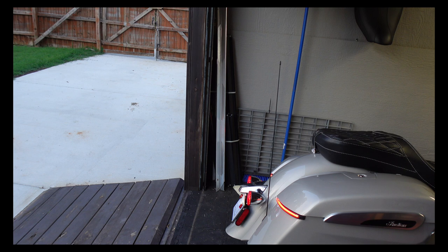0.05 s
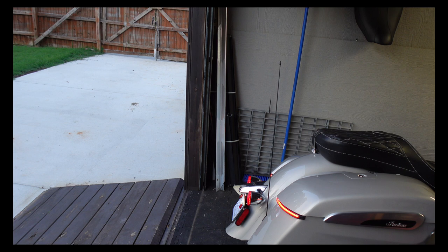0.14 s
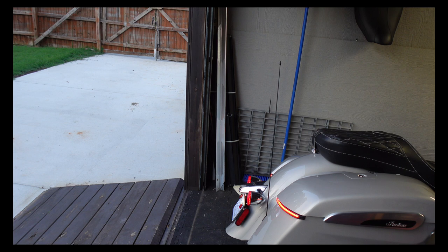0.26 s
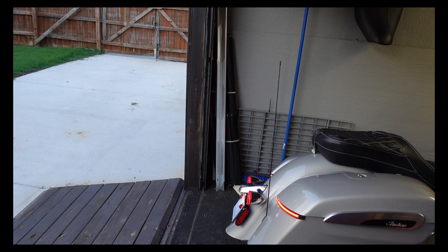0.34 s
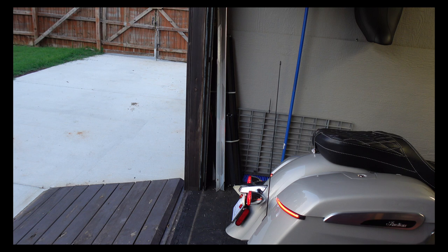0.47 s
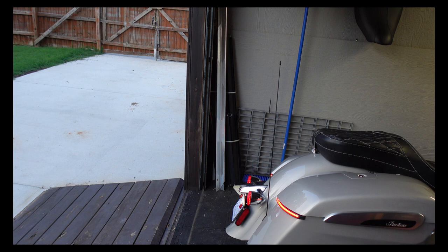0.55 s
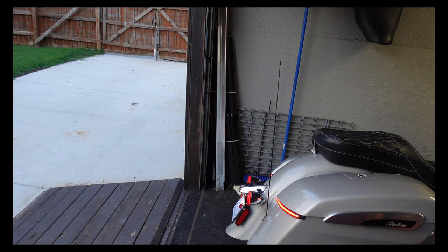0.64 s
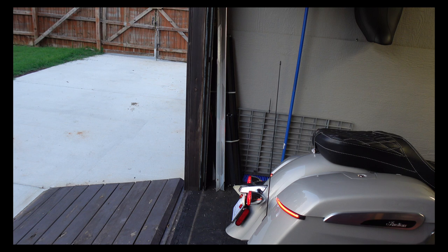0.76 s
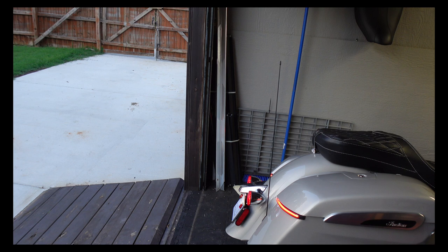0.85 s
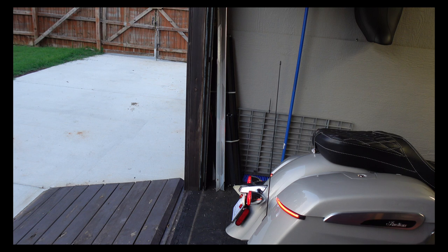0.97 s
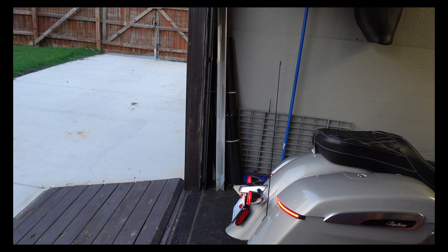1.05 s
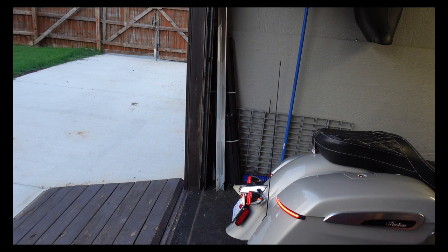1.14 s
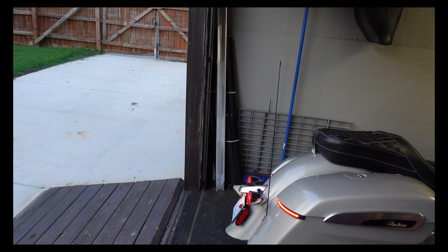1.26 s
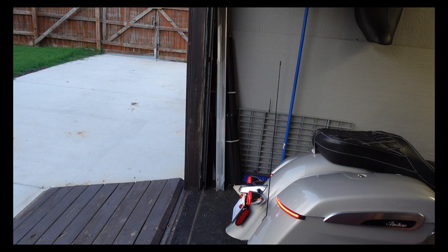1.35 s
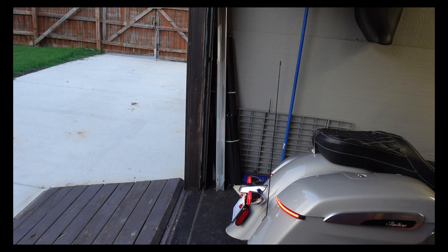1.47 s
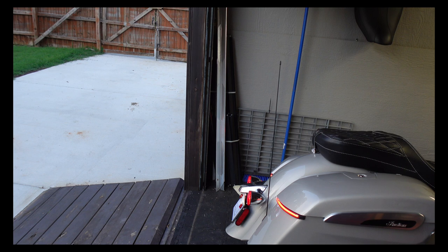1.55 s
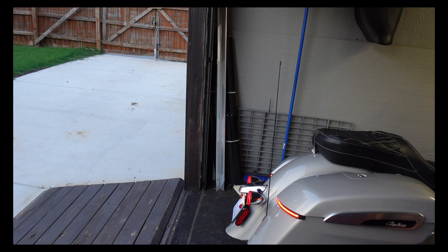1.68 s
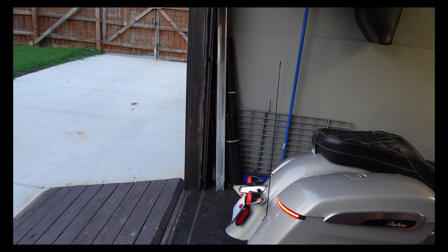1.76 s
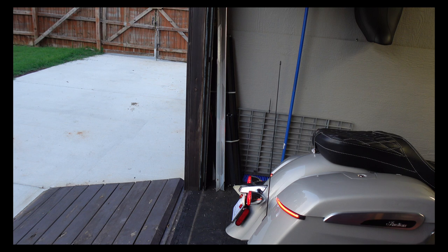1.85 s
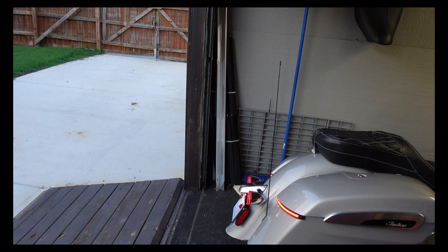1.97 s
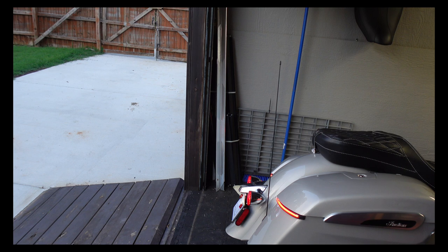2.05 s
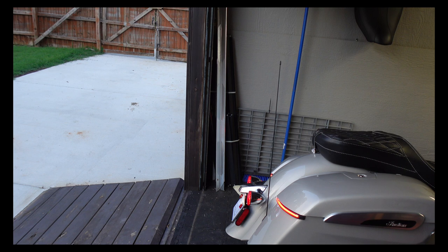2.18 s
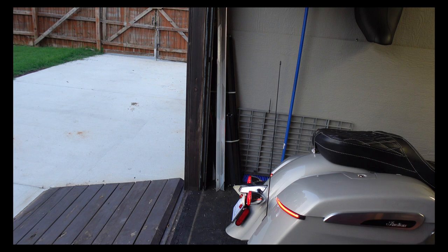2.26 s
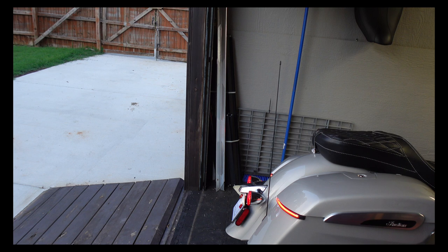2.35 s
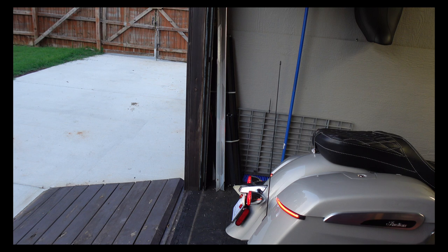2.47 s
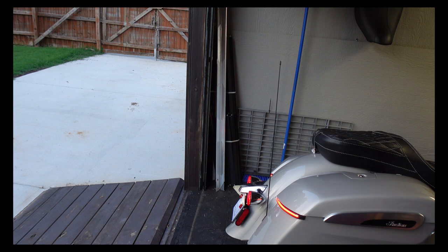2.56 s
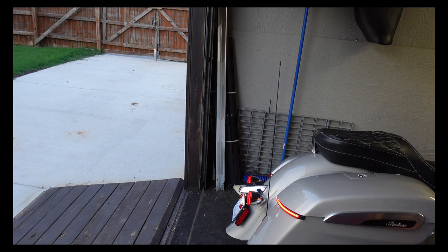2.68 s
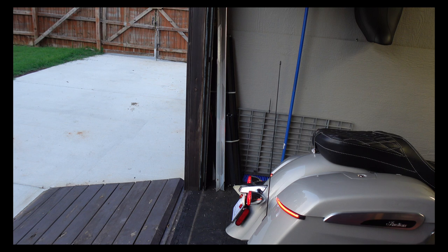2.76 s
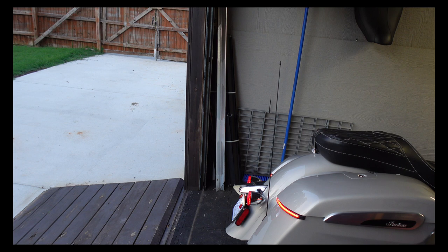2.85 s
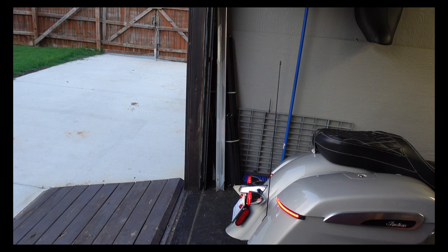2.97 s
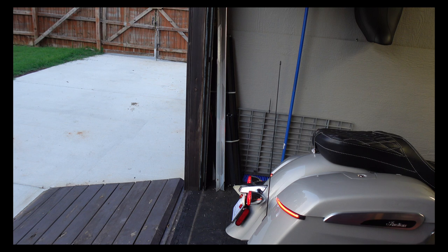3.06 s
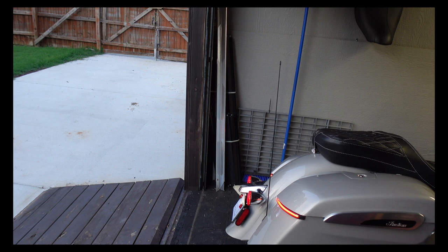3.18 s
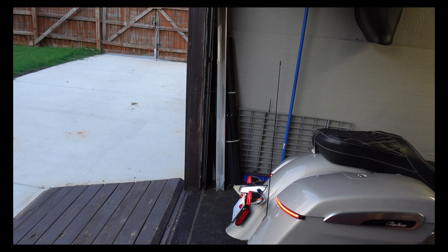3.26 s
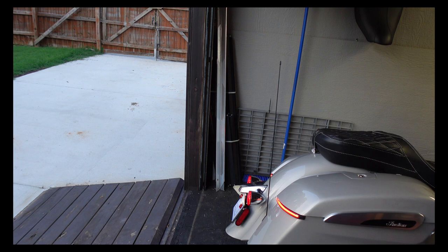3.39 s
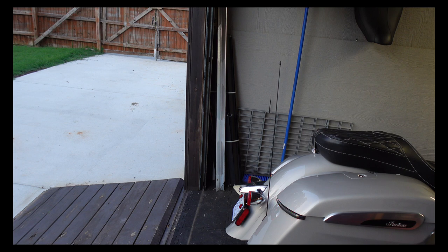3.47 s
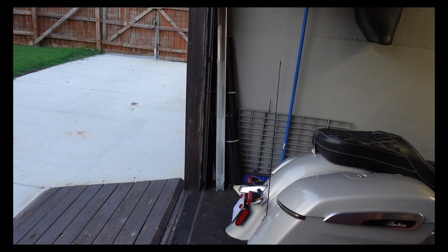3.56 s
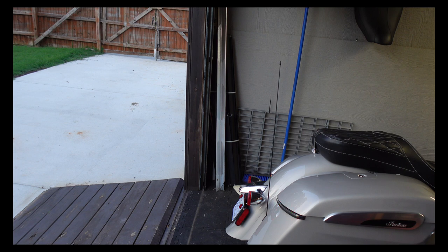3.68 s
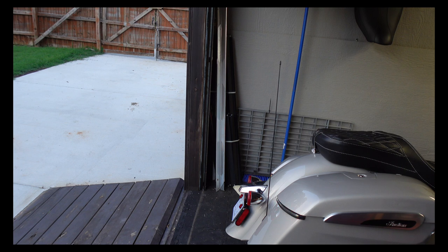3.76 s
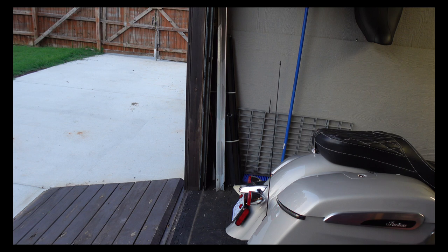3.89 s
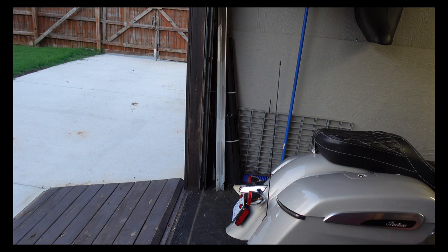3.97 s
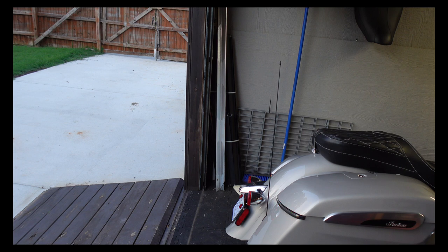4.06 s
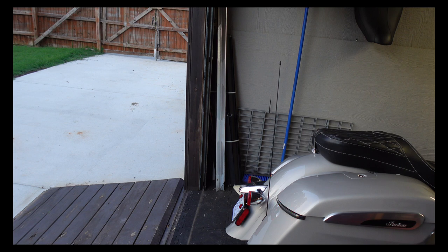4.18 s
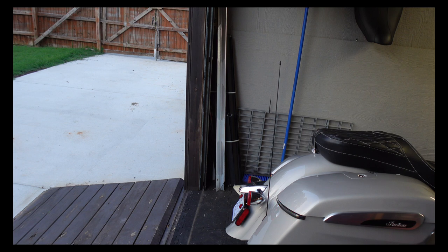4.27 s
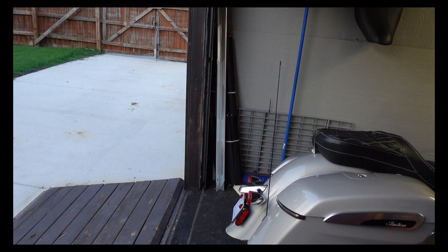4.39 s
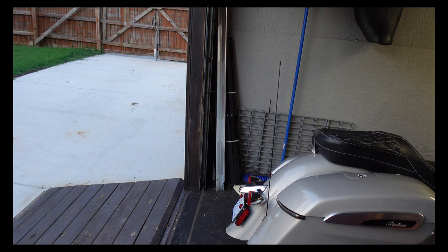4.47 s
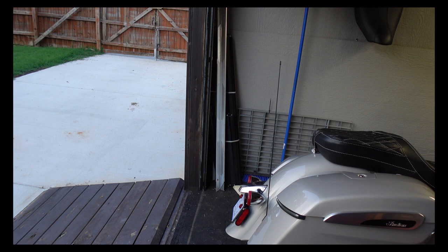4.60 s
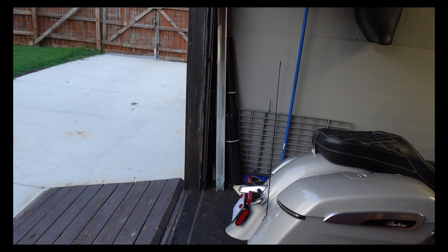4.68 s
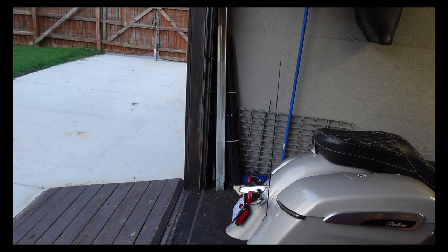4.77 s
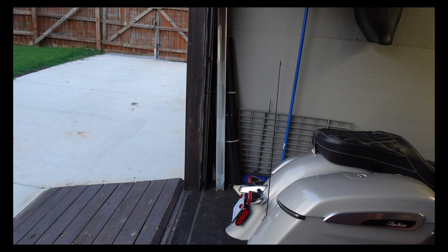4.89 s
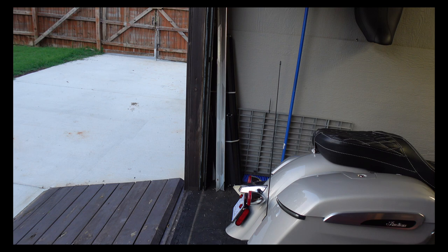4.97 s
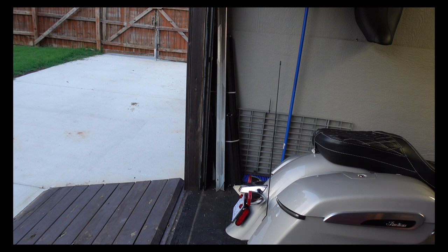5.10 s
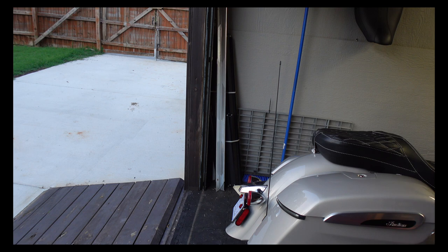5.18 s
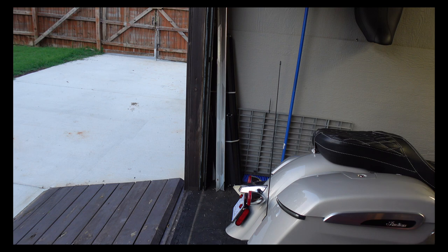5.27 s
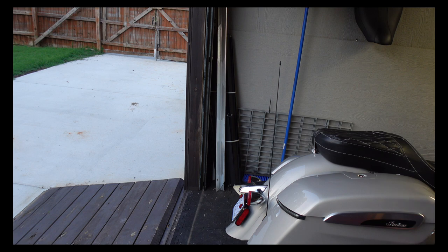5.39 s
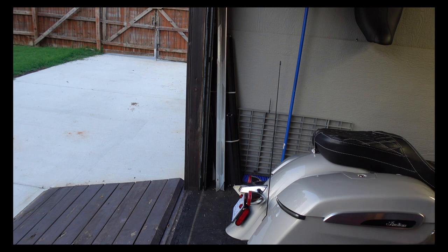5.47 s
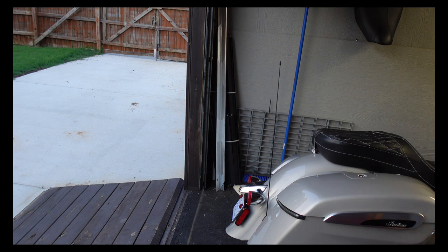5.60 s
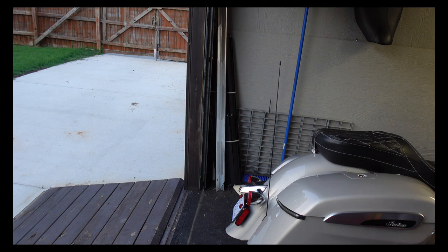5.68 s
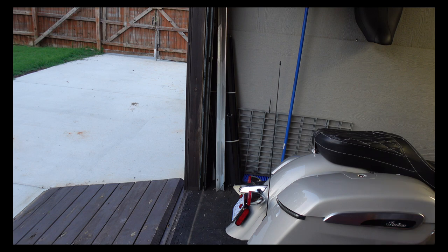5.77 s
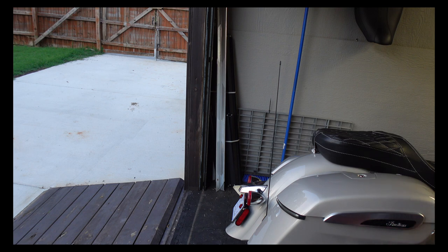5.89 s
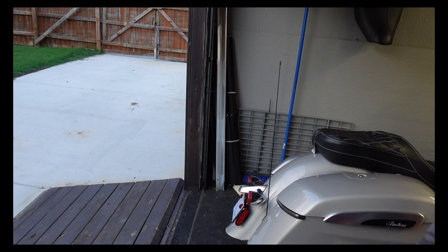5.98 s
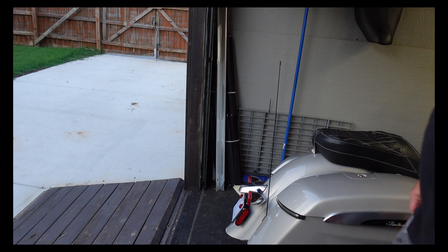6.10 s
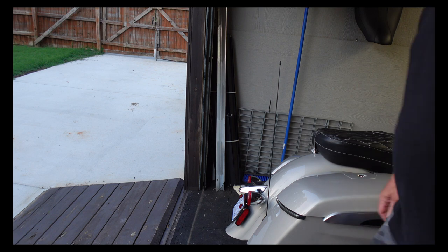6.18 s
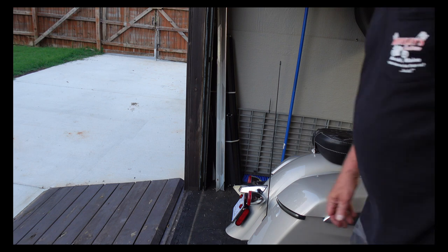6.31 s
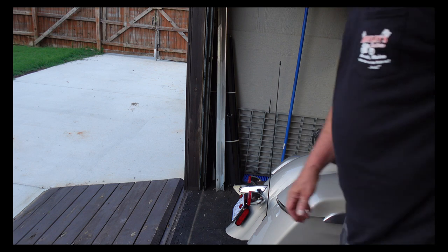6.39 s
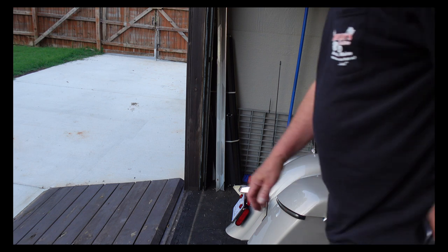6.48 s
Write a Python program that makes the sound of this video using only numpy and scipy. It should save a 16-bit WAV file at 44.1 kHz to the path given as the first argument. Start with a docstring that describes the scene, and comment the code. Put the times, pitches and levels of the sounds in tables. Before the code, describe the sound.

Loud, lumpy motorcycle idle close to the tailpipe, then shut-off: weakening chugs, a metallic clunk, a short airy sigh, and quiet insect hum.

```python
"""Motorcycle idling, then switched off

A big V-twin idles just inside an open garage, its tailpipe close to the microphone, and is switched off.
Each uneven firing cracks, rings the pipe and comes back as a thump; its pressure swing chokes the microphone.
The engine coasts through a few puffs, then knocks and rocks back with a sigh of air.
Shaped noise makes the cracks, sighs and clatter, struck resonators the pipe and boom, short pulses the thumps.
Insects and a far hum outdoors run underneath throughout and are left alone at the end."""
import sys
import numpy as np
from scipy import signal
from scipy.fft import rfft, irfft
from scipy.io import wavfile

SR = 44100
rng = np.random.default_rng(int(sys.argv[2]) if len(sys.argv) > 2 else 0)


def unload_wav(signal):
    """Save mono or channel-first audio to the path in sys.argv[1] as 16-bit WAV at rate SR, clipped to [-1, 1]."""
    wavfile.write(
        sys.argv[1],
        SR,
        np.round(np.clip(np.atleast_2d(signal).T, -1, 1) * 32767).astype(np.int16),
    )


N = 288410
TIME = np.arange(N) / SR
AGE = np.arange(SR // 3) / SR  # seconds since a stroke or knock began


def undb(db):
    """Turn decibels into an amplitude factor."""
    return 10 ** (np.asarray(db) / 20)


def unit(x):
    """Scale to an rms of 1."""
    return x / np.sqrt(np.mean(x ** 2))


def add(track, start_s, sound):
    """Mix a sound into a track, trimmed to the track's ends."""
    start = int(round(start_s * SR))
    first, last = max(start, 0), min(start + len(sound), N)
    track[first:last] += sound[first - start:last - start]


def noise(colour):
    """Noise of rms 1, its spectrum drawn through (Hz, relative dB) points on a log frequency scale."""
    hz, db = np.transpose(colour)
    log_hz = np.log(np.fft.rfftfreq(N, 1 / SR) + 1)  # the 1 avoids log of zero
    gain = undb(np.interp(log_hz, np.log(hz), db))
    return unit(irfft(rfft(rng.standard_normal(N)) * gain, N))


def band(hz, width, size):
    """Noise of rms 1 through a resonance applied twice; the width in Hz is that of one pass."""
    b, a = signal.iirpeak(hz, hz / width, fs=SR)
    once = signal.lfilter(b, a, rng.standard_normal(size))
    return unit(signal.lfilter(b, a, once))


def swell(rise, fade, hold=0):
    """Smooth rise, hold, then exponential fade, all in seconds."""
    onset = np.sin(np.pi / 2 * np.minimum(AGE / rise, 1)) ** 2
    return onset * np.exp(-np.maximum(AGE - rise - hold, 0) / fade)


def ring(modes, detune, scatter_db):
    """Struck decaying resonances; pitch and strength differ from stroke to stroke, as with gas heat."""
    kick, out = signal.unit_impulse(len(AGE)), 0
    for hz, db, t60 in modes:
        turn = 2 * np.pi * hz * (1 + detune * rng.standard_normal()) / SR  # radians per sample
        keep = np.exp(-np.log(1000) / (t60 * SR))  # amplitude kept per sample
        mode = signal.lfilter([0, np.sin(turn)], [1, -2 * keep * np.cos(turn), keep ** 2], kick)
        out = out - undb(db + scatter_db * rng.standard_normal()) * mode
    return out


def thump(hz, delay, length):
    """A low pressure pulse: a cosine in a bell-shaped window, its timing slightly uneven."""
    t = AGE - delay - 0.00016 * rng.standard_normal()
    return np.exp(-(t / length) ** 2) * np.cos(2 * np.pi * hz * t)


# Far traffic's spectrum. Each row: frequency in Hz, relative density in dB.
YARD = [(20, -7), (50, -2), (100, 3), (200, 2.5), (300, -2.5), (500, -6), (1000, -2.5), (1400, -7),
        (1900, -16.5), (2600, -13), (3500, -40.5)]
# The insect chorus's spectrum. Each row: frequency in Hz, relative density in dB.
INSECTS = [(2000, -15), (2600, -18), (3100, -2), (5200, -1.5), (6100, -8), (6700, -2), (7400, -15.5),
           (8500, -26.5), (12000, -29), (16000, -32)]
# Loudness outdoors. Each row: time in seconds, insect level in dB, level of traffic and hum in dB.
OUTSIDE = [(4.5, -50, -55), (5.5, -48.5, -54), (5.7, -47.5, -52.5)]


def outdoors():
    """An insect chorus with a light flutter over far traffic; narrow noise makes a wavering hum."""
    s, insect_db, traffic_db = np.transpose(OUTSIDE)
    flutter = 1 + 0.056 * band(16, 17, size=N)
    chorus = undb(np.interp(TIME, s, insect_db)) * noise(INSECTS) * flutter
    hum = 0.67 * band(102.3, 18, size=N) + 0.26 * band(156.3, 12, size=N)
    traffic = 0.89 * noise(YARD) + hum
    return chorus + undb(np.interp(TIME, s, traffic_db)) * traffic


# Sighs of trapped air. Each row: start in seconds, level in dB, rise, hold and fade in seconds.
SIGHS = [(4.048, -22, .1, .02, .031), (4.215, -37, .022, .006, .09)]
# The sigh's breath spectrum. Each row: frequency in Hz, relative density in dB.
SIGH_COLOUR = [(120, -34), (200, -8), (509, -3), (558, 3), (968, 0), (1370, -11), (1500, 0.5), (1650, -7),
               (4600, -9.5), (10500, -24), (13500, -36), (16000, -59)]
# The sigh's resonances. Each row: frequency in Hz, half the filter width in Hz, relative level in dB.
SIGH_MODES = [(986, 41, -4), (1480, 41, -2.5), (1850, 30, -4), (2342, 27, -3.5), (3070, 72, -7)]


def sighs():
    """Trapped air sighs out as fluttering breath noise coloured by narrow resonances."""
    air = np.zeros(N)
    for s, db, rise, hold, fade in SIGHS:
        add(air, s, undb(db) * swell(rise, fade, hold))
    tones = sum(undb(db) * band(hz, 2 * half_width, size=N) for hz, half_width, db in SIGH_MODES)
    flutter = undb(1.5 * band(85, 200, size=N))
    return air * flutter * (.85 * noise(SIGH_COLOUR) + .5 * unit(tones))


# Knocks and ticks as the crank stops and rocks back, then small handling sounds.
# Each row: start in seconds, level in dB, pitch in Hz, fade in seconds.
KNOCKS = [(3.77, -25, 790, 0.023), (3.895, -19, 130, 0.018), (3.972, -37, 3900, .015),
          (4.003, -19, 210, 0.02), (4.012, -25, 560, 0.035), (4.03, -32, 55, 0.055),
          (4.165, -31, 150, 0.012), (4.228, -34, 700, 0.064), (4.48, -50, 1100, .03),
          (6.082, -60, 8500, .004), (6.17, -48.5, 396, .02)]
# The frame's clunk. Each row: frequency in Hz, level in dB, 60 dB decay in seconds before the swell's fade.
CLUNK = [(331, -21, 0.41), (540, -14.5, .3), (575, -19.5, .25), (745, -27, 0.23)]
STALL_S = 4.005


def knocks():
    """The crank knocks against compression in short noise bands; the frame rings as the crank stalls."""
    out = np.zeros(N)
    for s, db, hz, fade in KNOCKS:
        add(out, s, undb(db) * swell(0.005, fade) * band(hz, 0.83 * hz, size=len(AGE)))
    add(out, STALL_S, ring(CLUNK, detune=.004, scatter_db=3) * swell(0.013, 0.074))
    return out


# Hunting idle speed. Each row: time in seconds, crank speed in rpm.
RPM = [(0.0, 1048), (0.25, 1049), (0.34, 979), (0.66, 934), (1.0, 992), (1.34, 1040), (1.75, 891),
       (1.92, 954), (2.1, 902), (2.18, 1032), (2.27, 935), (2.64, 989), (2.72, 901), (3.05, 947),
       (3.14, 892), (3.22, 992), (3.51, 973), (3.6, 1039)]
# Each cylinder's firing. Each row: crank angle in degrees, crack level in dB, crack pitch in Hz,
# boom level in dB, returning thump level in dB, thump pitch in Hz, thump delay in seconds.
CYLINDERS = [(20.48, -6, 3840, -11.3, -7.5, 193, .0418), (431.5, -4.5, 3893, -13, -10.5, 125, .045)]
# Stumbles, where a charge burns weakly. Each row: time in seconds, change of crack level in dB.
STUMBLES = [(.01, -13), (.235, -8.5), (.863, -16), (1.096, -7.5), (1.331, -6), (1.449, -2.5), (1.7, -11.5),
            (2.213, -1.5), (2.464, -12), (2.658, -1.5), (2.715, -8.5), (3.102, -4), (3.352, -6)]
# Firings that bark at a lower pitch: times in seconds.
BARKS_S = [1.571, 1.777, 2.339, 3.475]
BARK_HZ = 2170
IGNITION_OFF_S = 3.63
CYCLE_DEG = 720  # each cylinder fires once in two turns
# spread from one firing to the next, the pitches as a log ratio
CRACK_SCATTER_DB, BOOM_SCATTER_DB, THUMP_SCATTER_DB = 1, 0.4, 2.1
CRACK_PITCH_SPREAD, THUMP_PITCH_SPREAD = 0.073, 0.06
BOOM_LOSS_SHARE, THUMP_LOSS_SHARE = 0.26, 0.32  # share of a stumble's dB loss in the bass


def firings():
    """The turning crank fires each cylinder at its angle; yields a start time and that firing's settings."""
    crank_deg = np.cumsum(np.interp(TIME, *np.transpose(RPM))) * 360 / 60 / SR
    last_deg = np.interp(IGNITION_OFF_S, TIME, crank_deg)
    for angle, crack_db, crack_hz, boom_db, thump_db, thump_hz, thump_s in CYLINDERS:
        for s in np.interp(np.arange(angle, last_deg, CYCLE_DEG), crank_deg, TIME):
            loss_db = sum(db for when, db in STUMBLES if abs(when - s) < .025)
            barks = any(abs(when - s) < .025 for when in BARKS_S)
            loud, sharp, deep, back, pitch = np.clip(rng.standard_normal(5), -2, 2)
            yield (s,
                   crack_db + loss_db + CRACK_SCATTER_DB * loud,
                   BARK_HZ if barks else crack_hz * np.exp(CRACK_PITCH_SPREAD * sharp),
                   boom_db + BOOM_LOSS_SHARE * loss_db + BOOM_SCATTER_DB * deep,
                   thump_db + THUMP_LOSS_SHARE * loss_db + THUMP_SCATTER_DB * back,
                   thump_hz * np.exp(THUMP_PITCH_SPREAD * pitch),
                   thump_s)


def crack(hz, hiss, force, length=0.0028, whistle=0.54, drive=1.22, afterring=0.079):
    """The gas front steepens into a rasping, saturated whistle; a weak charge stays dull and rings on."""
    window = np.exp(-((AGE - .004) / length) ** 4)
    growth = np.clip(AGE / 0.0057, 0, 1)
    steep = growth * force
    dull = signal.sosfilt(signal.butter(3, 4900, fs=SR, output="sos"), hiss)
    tone = band(hz, 1160, size=len(AGE))
    rasp = (1 - steep) * dull + steep * hiss + whistle * tone
    front = drive * window * (.5 + 0.53 * growth) * rasp
    saturated = force * np.tanh(front) + (1 - force) * 0.81 * front
    return saturated + afterring * (2 - force) * swell(0.0063, 0.015) * tone


def choke(strength):
    """The two widest half-swings of pressure pin the microphone, which then passes little fine sound."""
    t = AGE - 0.00032 * rng.standard_normal()
    pinned = np.exp(-((t - .0079) / 0.0015) ** 6) + np.exp(-((t - .0134) / 0.0018) ** 6)
    return 1.55 * np.clip(strength, 0, 1) * pinned


# Exhaust and garage boom. Each row: frequency in Hz, relative level in dB, 60 dB decay in seconds
# before the swell's fade.
BOOM = [(60.5, -7.5, 0.2), (97.1, 4, 0.24), (143.7, -5, 0.12), (192.4, -9, 0.2), (251, -9, 0.12),
        (304, -9.5, 0.16)]
# Pipe resonances. Each row: frequency in Hz, relative level in dB, 60 dB decay in seconds
# before the swell's fade.
PIPE = [(552.4, -17.5, 0.33), (640, -19, 0.23), (781, -14, 0.18), (809, -16, 0.16), (888, -23, 0.12),
        (1004, -16.5, 0.3), (1052, -18, 0.3), (1261, -19.5, 0.13), (2006, -16.5, 0.1), (2750, -24.5, 0.14)]
# Garage air modes: one swells with the thump, a higher one just after. Each row: frequency in Hz,
# relative level in dB, time of the peak in seconds, length in seconds.
DRONE = [(188.9, -8, .0412, 0.024), (252.7, -11, .054, 0.022)]
PIPE_DB, NEAR_WALL_DB, GARAGE_DB = -7, -11.5, -29.5
SHAKE_DB = 9  # extra rattle when the thump shakes the loose parts
# a crack steepens, and chokes the microphone, over a range above a threshold
STEEP_FROM_DB, STEEP_RANGE_DB = -11, 6.5
CHOKE_FROM_DB, CHOKE_RANGE_DB = -11, 6.5


def fire(tracks, hiss, s, crack_db, crack_hz, boom_db, thump_db, thump_hz, thump_s):
    """One firing cracks, booms, rings the pipe, thumps back and feeds the wash, rattle and choke."""
    bass, pipe, cracks, wash, gas, running, pinned = tracks
    i = int(s * SR)
    force = np.clip((crack_db - STEEP_FROM_DB) / STEEP_RANGE_DB, 0, 1)
    add(cracks, s, undb(crack_db) * crack(crack_hz, hiss[i:i + len(AGE)], force))
    add(bass, s, undb(boom_db) * ring(BOOM, detune=0.0065, scatter_db=0.6) * swell(0.0045, .7))
    # the pulse comes back inverted from across the yard, and the garage drones with it
    echo = undb(-1.0) * thump(thump_hz, delay=thump_s, length=0.0056)
    drone = sum(undb(db) * thump(hz, delay, length) for hz, db, delay, length in DRONE)
    add(bass, s, -undb(thump_db) * (echo + drone))
    add(pipe, s, undb(PIPE_DB) * ring(PIPE, detune=0.0069, scatter_db=3) * swell(.014, .5))
    # near walls answer at once, the whole garage lingers; squared, so that overlaps add as power
    near = undb(NEAR_WALL_DB + 1.17 * crack_db) * swell(0.0077, 0.013)
    garage = undb(GARAGE_DB + .5 * crack_db) * swell(.011, 0.026)
    add(wash, s + 0.0028, near ** 2 + garage ** 2)
    add(running, s, swell(0.012, 0.065))
    add(running, s + thump_s, (undb(SHAKE_DB + thump_db) * swell(0.0033, .014)) ** 2)
    add(pinned, s, choke((crack_db - CHOKE_FROM_DB) / CHOKE_RANGE_DB))


# Unfired strokes while coasting. Each row: start in seconds, gas level in dB, chug level in dB,
# gas rise in seconds, gas fade in seconds.
PUFFS = [(3.671, -17.5, -3, 0.0031, 0.022), (3.731, -15.5, -5, 0.0056, 0.015),
         (3.833, -21, -8, 0.0042, 0.02), (3.936, -23.5, -14.5, 0.0035, 0.017),
         (4.012, -24.5, -16.5, 0.012, 0.021)]


def coast(tracks):
    """Each unfired stroke puffs gas and chugs: two low pulses with a little boom and pipe ring."""
    bass, pipe, cracks, wash, gas, running, pinned = tracks
    for s, gas_db, chug_db, rise, fade in PUFFS:
        add(gas, s, (undb(gas_db) * swell(rise, fade)) ** 2)
        chug = thump(97.5, delay=0.0119, length=0.0098) + 0.47 * thump(104, delay=0.044, length=0.0083)
        add(bass, s, undb(chug_db) * (chug + 0.18 * ring(BOOM, detune=0.016, scatter_db=5.5)))
        add(pipe, s, undb(.5 * chug_db - 12.5) * ring(PIPE, detune=0.0077, scatter_db=5.0))
        add(running, s, undb(chug_db - 4.5) * swell(0.027, 0.054))


# Spectra of the crack's hiss, the garage's wash, the unburnt gas of a coasting stroke, the valve gear
# and loose parts, and the running rumble. Each row: frequency in Hz, relative density in dB.
CRACK = [(300, -37), (700, 2.5), (1500, -7), (2300, -0.5), (4300, 1.5), (5400, -6), (8000, -8.5),
         (9500, -22), (12500, -21.5), (16000, -34)]
TAIL = [(300, -20.5), (800, -2), (1600, -7.5), (2200, 4.5), (2800, -7), (3400, 1.5), (4500, -7.5),
        (5600, -5.5), (9000, -14.5), (11000, -24), (16000, -36)]
GAS = [(300, -1), (800, 3.5), (1500, -5.5), (2300, 1.5), (4300, 2.5), (6000, -2), (9000, -14.5),
       (13000, -30), (16000, -34)]
CLATTER = [(200, -1), (330, 9.5), (450, -1.5), (800, 6.5), (1050, 2), (1600, -9.5), (2100, -5),
           (4200, -11.5), (6500, -25), (10000, -39.5), (16000, -46)]
RUMBLE = [(22, -26), (40, -13), (60, 2), (100, -1), (200, -1), (300, -0.5), (420, -16.5), (800, -59)]
CLATTER_DB, RUMBLE_DB = -26.5, -20.5


def engine():
    """Firings and coasting strokes, with the garage's wash and the valve gear's clatter."""
    tracks = np.zeros((7, N))
    bass, pipe, cracks, wash, gas, running, pinned = tracks  # wash, gas and running hold power
    hiss = noise(CRACK)
    for firing in firings():
        fire(tracks, hiss, *firing)
    coast(tracks)
    # separate reflections make the wash grainy; rattling parts come and go
    grain = undb(1.5 * band(230, 600, size=N))
    reflections = (np.sqrt(wash) * noise(TAIL) + np.sqrt(gas) * noise(GAS)) * grain
    rattle = undb(3.0 * band(65, 137, size=N))
    clatter = undb(CLATTER_DB) * np.sqrt(running) * noise(CLATTER) * rattle
    # the widest swings flatten, so the boom stays even
    bass = 0.73 * np.tanh(bass / 0.7)
    # the microphone stage passes little of the engine's deepest bass
    highpass = signal.butter(4, 36, "high", fs=SR, output="sos")
    bass = signal.sosfiltfilt(highpass, bass, padtype=None)
    rumble = undb(RUMBLE_DB) * np.sqrt(running) * noise(RUMBLE)
    fine_sound = cracks + pipe + reflections + clatter
    return bass + rumble + fine_sound * np.clip(1 - pinned, .07, 1)


def scene():
    """Outdoors, the stopping sounds and the engine, mixed to one channel."""
    return (outdoors() + sighs() + knocks() + engine())[None]


def record(dry):
    """The microphone stage softly rounds the peaks and cuts the top steeply."""
    rounded = np.tanh(dry / 1.05) * 1.05
    lowpass = signal.ellip(8, .2, 70, 15900, fs=SR, output="sos")  # cutoff in Hz
    return signal.sosfilt(lowpass, rounded)


dry = scene()
out = record(dry)
unload_wav(out)
```